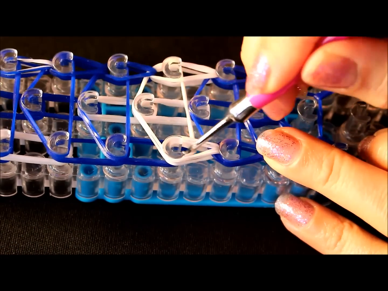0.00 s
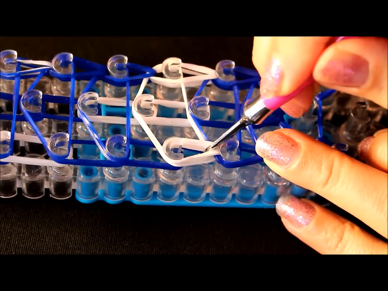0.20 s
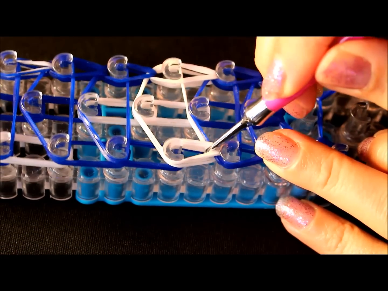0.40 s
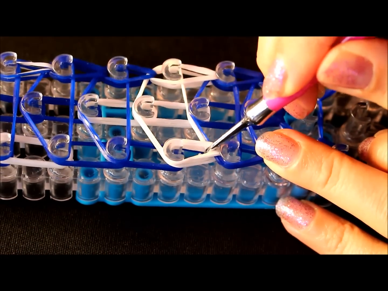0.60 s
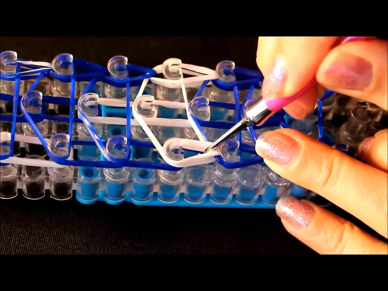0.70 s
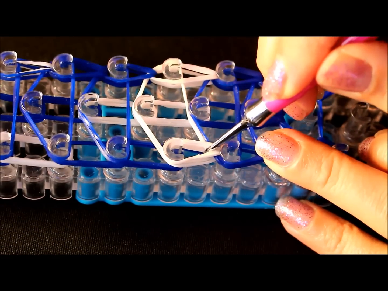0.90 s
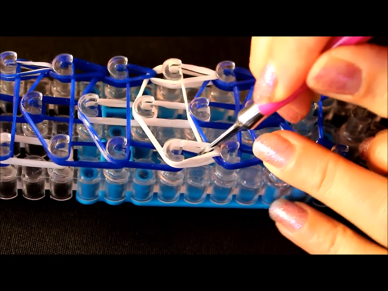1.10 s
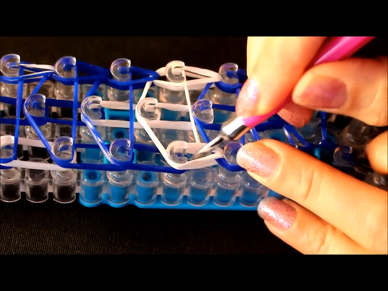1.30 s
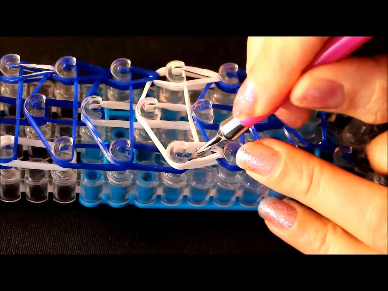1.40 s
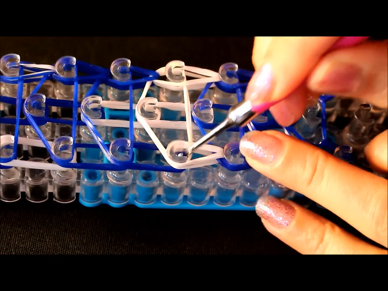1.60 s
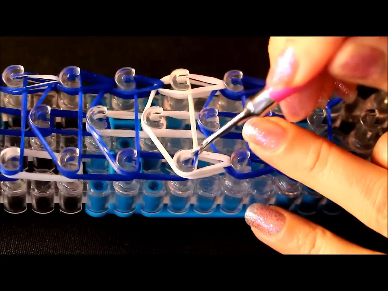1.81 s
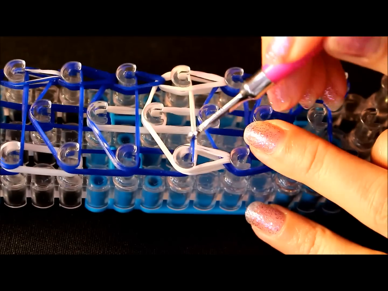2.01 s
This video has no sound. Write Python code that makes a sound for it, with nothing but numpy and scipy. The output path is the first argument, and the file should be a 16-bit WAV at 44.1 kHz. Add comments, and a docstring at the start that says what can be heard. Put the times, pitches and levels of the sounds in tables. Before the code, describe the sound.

One sharp click of a metal hook on a plastic loom, then faint ticks and knocks.

```python
"""A small room, close to a plastic loom: a metal crochet hook works rubber bands over the pegs.
The hook snaps off a peg once, with two quick echoes, then ticks lightly; hook and peg ring.
A band twangs, then rubs and slips along the hook. Under the fingers the loom's base knocks
and bumps on the table. Faint mains hum and hiss lie underneath."""
import sys
import numpy as np
from scipy import signal
from scipy.fft import rfft, irfft
from scipy.io import wavfile

SR = 44100
rng = np.random.default_rng(int(sys.argv[2]) if len(sys.argv) > 2 else 0)


def generate_wav(signal):
    """Clip the signal to [-1, 1] and save it as 16-bit WAV at the path in sys.argv[1]."""
    frames = np.transpose(np.atleast_2d(signal))
    scaled = np.clip(frames, -1, 1) * 32767
    pcm = np.round(scaled).astype(np.int16)
    wavfile.write(sys.argv[1], SR, pcm)


N = 92610

# spectra: room air, its side signal, reflections, band rub, crack (frequency [Hz], gain [dB])
AIR_EQ = [(15, -32), (25, -34), (53, -10), (69, -11), (101, 2.5), (122, -12.5), (140, -6), (260, -7.5),
          (399, -12.5), (614, -13.5), (919, -14), (8580, -24), (15500, -34)]
AIR_SIDE_EQ = [(30, -12), (150, 0), (500, 5), (1500, 3.5), (5000, 2.5), (15000, -0.5)]
ROOM_EQ = [(100, -10), (300, -1), (600, 4.5), (1000, 7), (2200, -7.5), (4000, -11), (8000, -4), (15000, -6)]
RUB_EQ = [(2400, -8), (3600, 1.5), (6000, -21)]
CRACK_EQ = [(100, -38), (300, 12), (700, -7.5), (1500, -2), (3000, 3.5), (4800, -2.5), (6500, -9),
            (9000, -22.5), (13000, -21.5), (15500, -59)]
# mains hum (frequency [Hz], level [dB])
HUM_PARTIALS = [(49.7, -70), (99.4, -67.5), (150, -70.5), (199.5, -68.5), (399, -74)]
# resonances (frequency [Hz], gain [dB], T60 [s])
TABLE_MODES = [(131.5, 3, 0.29), (190, -3, 0.14), (237, -3, 0.083), (288, -1.5, 0.065), (309, -9, 0.032),
               (396.5, -5, 0.064)]
BASE_MODES = [(689, 2, 0.017), (855, 1.5, 0.01), (906, 0, 0.019), (1069, -12, 0.05), (1190, -1, 0.033),
              (1295, -12, 0.02), (1495, 3.5, 0.035), (1647, 2, 0.027)]
PEG_MODES = [(1122, -12.5, 0.028), (1430, -29, 0.036), (1750, -26, 0.025), (2004, -5, 0.025),
             (2276, -1, 0.027), (2520, -8, 0.02), (2740, -7, 0.012), (5740, -5.5, 0.038)]
HOOK_MODES = [(2930, -20, 0.027), (3550, -1.5, 0.017), (3795, 2.5, 0.0077), (3925, 1.5, 0.01),
              (4130, -9.5, 0.0065)]
# loom bumps the table; base rocks (time [s], level [dB], focus [Hz])
TABLE_BUMPS = [(.2252, -27.5, 377), (.404, -43.5, 234), (.4265, -38, 202), (.454, -39, 149),
               (.571, -43.5, 226), (1.04, -45.5, 250), (1.085, -48.5, 225), (1.12, -44, 234),
               (1.155, -46, 194), (1.34, -39, 280), (1.37, -39.5, 275), (1.393, -37, 340),
               (1.537, -33.5, 334), (1.555, -39.5, 199), (1.652, -55, 252), (1.8135, -36.5, 182),
               (1.862, -41.5, 127)]
BASE_KNOCKS = [(.226, -38, 760), (.429, -45.5, 1250), (.453, -48, 1250), (1.339, -34, 910),
               (1.367, -43, 1080), (1.3905, -32, 856), (1.538, -44.5, 1110), (1.777, -38.5, 1100)]
# band is plucked; band catches and slips (time [s], level [dB])
BAND_TWANGS = [(1.2632, -46.5), (1.2765, -48)]
BAND_SLIPS = [(1.5735, -44.5), (1.6256, -42), (1.6505, -38.5), (1.703, -46), (1.7307, -51)]
# band drags along the hook (time [s], length [s], level [dB])
BAND_RUBS = [(1.579, 0.24, -63.5)]
# hook clicks, and two quick echoes just after the loud snap
# (time [s], hook [dB], hook focus [Hz], peg [dB], crack [dB], crack focus [Hz])
HOOK_CLICKS = [(.158, -37.5, 3900, -51, -62, 3800), (0.201, -37, 3600, -47, -62, 3000),
               (0.2247, -.5, 3990, -16, -20.5, 2200), (.2515, -25, 3660, -50, -57, 4500),
               (.274, -28, 4200, -55, -51, 4200), (.426, -54, 3200, -44, -49.5, 2200),
               (0.449, -54, 3200, -43, -46.5, 2200), (0.568, -56, 3200, -46, -57, 2400),
               (1.118, -55, 3500, -48, -59, 1800), (1.262, -36.5, 3550, -55, -54, 4000),
               (1.2727, -31.5, 3450, -36.5, -37, 5200), (1.3366, -23, 4360, -31.5, -39, 1700),
               (1.3652, -33, 3500, -40, -45, 5000), (1.3885, -60, 3700, -46, -44.5, 1500),
               (1.535, -46, 3870, -33, -44, 3500), (1.7745, -40, 3900, -54, -46, 1500),
               (1.9793, -41, 3750, -54, -47.5, 2650)]

HOOK_RISE_S, HOOK_WIDTH_OCT = 0.0013, 0.11


def undb(db):
    """Decibels to gain."""
    return 10 ** (np.asarray(db) / 20)


def unit(x):
    """Scale to unit rms."""
    return x / np.sqrt(np.mean(x ** 2))


def decay(t, t60_s):
    """Exponential fall, 60 dB in t60_s."""
    return np.exp(-np.log(1000) * t / t60_s)


def add(track, start_s, sound):
    """Mix a sound into a track."""
    i = max(int(start_s * SR), 0)
    track[i:i + len(sound)] += sound[:max(len(track) - i, 0)]


def colour(x, points, size=8192):
    """Minimum-phase filter through (frequency [Hz], gain [dB]) points."""
    hz, db = np.array(points, float).T
    log_hz = np.log(np.fft.rfftfreq(size, 1 / SR) + 1)
    log_gain = np.log(undb(np.interp(log_hz, np.log(hz), db)))
    cepstrum = irfft(log_gain)[:size // 2]
    cepstrum[1:] *= 2
    impulse = irfft(np.exp(rfft(cepstrum, size)))
    return signal.fftconvolve(x, impulse)[:len(x)]


def stereo(mid, side):
    """Mid/side to left/right."""
    return np.array([mid + side, mid - side])


def ring(modes, rise_s, focus_hz, width_oct):
    """Decaying modes of a struck body, weighted towards focus_hz."""
    t = np.arange(SR // 2) / SR
    hz, db, t60_s = np.array(modes, float).T[:, :, None]
    gain = undb(db) * np.exp(-.5 * (np.log2(hz / focus_hz) / width_oct) ** 2)
    partials = gain * np.sin(2 * np.pi * hz * t) * decay(t, t60_s)
    attack = 1 - np.exp(-(t / rise_s) ** 2)
    return partials.sum(0) * attack


def air_and_hum(air_db=-57.5):
    """Steady wide room hiss; mains hum in the middle."""
    t = np.arange(N) / SR
    mid, side = (unit(colour(rng.standard_normal(2 * N), AIR_EQ)[N:]) for _ in range(2))
    hum = sum(undb(db) * np.sqrt(2) * np.sin(2 * np.pi * (hz * t + rng.random()))
              for hz, db in HUM_PARTIALS)
    return undb(air_db) * stereo(mid, colour(side, AIR_SIDE_EQ)) + hum


def room(dry, gap_s=0.0035, side_db=-7):
    """Dense early reflections off table and walls, then a short tail."""
    early_db, early_t60_s, late_db, late_t60_s = -4.5, 0.1, -7.5, 0.36
    t = np.arange(SR // 2) / SR
    onset = np.clip(t / gap_s - 1, 0, 1)

    def reflections():
        impulse = sum(undb(db) * unit(rng.standard_normal(len(t)) * onset * decay(t, t60_s))
                      for db, t60_s in [(early_db, early_t60_s), (late_db, late_t60_s)])
        return signal.fftconvolve(dry, colour(impulse / np.sqrt(len(t)), ROOM_EQ))[:N]
    return stereo(reflections(), undb(side_db) * reflections())


def knocks(events, modes, rise_s, width_oct):
    """Blows on one body, each favouring its own range of modes."""
    out = np.zeros(N)
    for start_s, db, focus_hz in events:
        add(out, start_s, undb(db) * ring(modes, rise_s, focus_hz, width_oct))
    return out


def band_rubs(grains_per_s=2700):
    """A band drags along the hook: a soft swell of friction grains."""
    out = np.zeros(N)
    for start_s, length_s, db in BAND_RUBS:
        n = int(length_s * SR)
        grains = rng.standard_normal(N) * (rng.random(N) < grains_per_s / SR)
        swell = np.sin(np.pi * np.arange(n) / n)
        add(out, start_s, undb(db) * unit(colour(grains[:n], RUB_EQ) * swell))
    return out


def band_twangs(rest_hz=614, t60_s=0.11, beat_hz=21, strand_db=-5, octave_db=-11):
    """A plucked band's two strands beat as they fade."""
    sag_ratio, sag_s = 0.048, 0.015
    t = np.arange(SR // 2) / SR
    hz = rest_hz * (1 + sag_ratio * np.exp(-t / sag_s))  # sharp while the swing is wide
    partials = [(hz, 0), (hz + beat_hz, strand_db), (2 * hz, octave_db)]
    tone = sum(undb(db) * np.sin(2 * np.pi * np.cumsum(f) / SR) for f, db in partials)
    out = np.zeros(N)
    for start_s, db in BAND_TWANGS:
        add(out, start_s, undb(db) * tone * decay(t, t60_s))
    return out


def crack(focus_hz, rise_s=0.0014, boost_db=8, edge_ratio=2.1):
    """Short noise burst, boosted around focus_hz."""
    t = np.arange(SR // 20) / SR
    envelope = t / rise_s * np.exp(1 - t / rise_s)
    burst = colour(rng.standard_normal(len(t)) * envelope, CRACK_EQ)
    return colour(burst, [(focus_hz / edge_ratio, 0), (focus_hz, boost_db), (focus_hz * edge_ratio, 0)])


def band_slips(focus_hz=3650, crack_db=-13.5):
    """A band catches and slips; the hook rings with a small crack."""
    out = np.zeros(N)
    for start_s, db in BAND_SLIPS:
        add(out, start_s, undb(db) * ring(HOOK_MODES, HOOK_RISE_S, focus_hz, HOOK_WIDTH_OCT))
        add(out, start_s, undb(db + crack_db) * crack(focus_hz))
    return out


def hook_clicks(peg_rise_s=0.0016, peg_oct_per_gain=4.6):
    """Clicks and the snap's two echoes: crack, hook ring, peg ring; a louder peg has more modes."""
    out = np.zeros(N)
    peg_main_hz = max(PEG_MODES, key=lambda mode: mode[1])[0]
    for start_s, hook_db, hook_hz, peg_db, crack_db, crack_hz in HOOK_CLICKS:
        hook = ring(HOOK_MODES, HOOK_RISE_S, hook_hz, HOOK_WIDTH_OCT)
        peg = ring(PEG_MODES, peg_rise_s, peg_main_hz, peg_oct_per_gain * undb(peg_db))
        add(out, start_s, undb(hook_db) * hook + undb(peg_db) * peg)
        add(out, start_s, undb(crack_db) * crack(crack_hz))
    return out


def scene():
    """Hook, bands and loom near the centre, room around; the mix leans slightly left."""
    direct = hook_clicks() + band_slips() + band_twangs() + band_rubs()
    direct += knocks(BASE_KNOCKS, BASE_MODES, rise_s=0.0014, width_oct=0.45)
    direct += knocks(TABLE_BUMPS, TABLE_MODES, rise_s=0.0018, width_oct=0.53)
    balance_db = 0.8
    return (direct + room(direct) + air_and_hum()) * undb([[balance_db / 2], [-balance_db / 2]])


def record(dry):
    """Steep low-pass on the top treble."""
    cutoff_hz = 15600
    return signal.sosfilt(signal.ellip(10, .2, 70, cutoff_hz, fs=SR, output="sos"), dry)


dry = scene()
out = record(dry)
generate_wav(out)
```